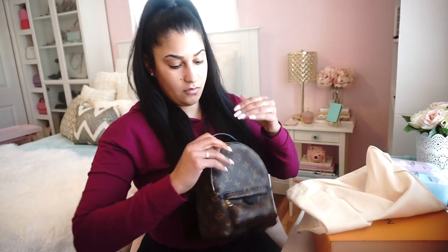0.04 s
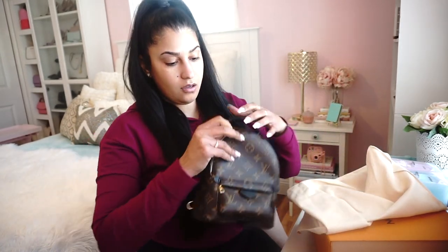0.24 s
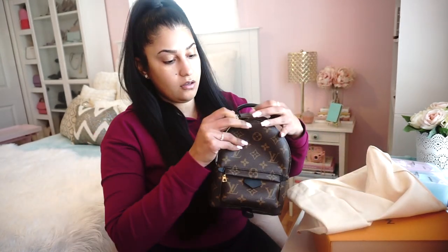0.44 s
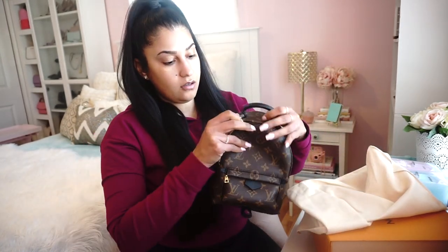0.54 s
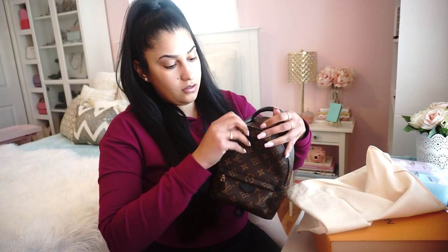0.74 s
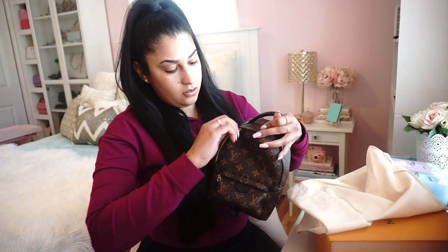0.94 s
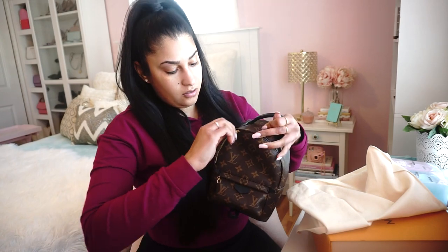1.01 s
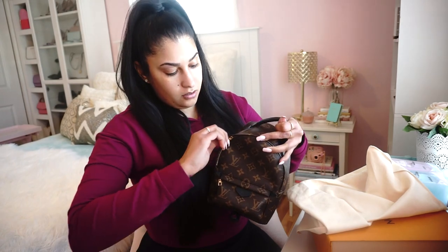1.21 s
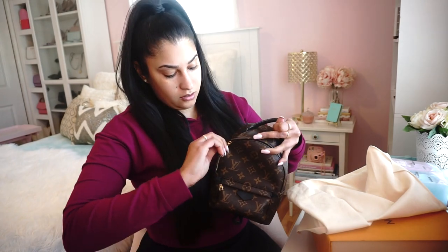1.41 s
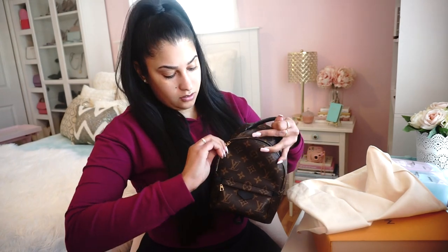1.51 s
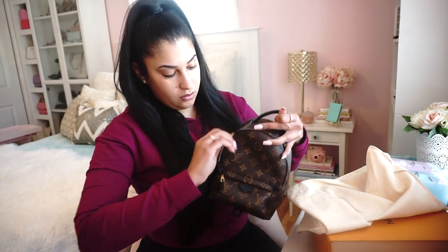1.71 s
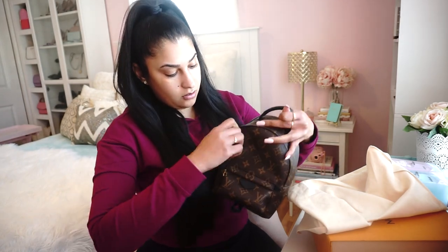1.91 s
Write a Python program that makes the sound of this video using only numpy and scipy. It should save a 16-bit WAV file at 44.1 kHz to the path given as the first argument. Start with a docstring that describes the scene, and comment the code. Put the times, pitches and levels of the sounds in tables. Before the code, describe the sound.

A stiff, hollow coated-canvas bag is turned in the hands, close to the microphone in a small quiet bedroom: soft rustle, a sharp zip-pull clink, light knocks, then a dense burst of louder bumps and a few last taps.

```python
"""In a small, quiet bedroom, a stiff coated-canvas bag is turned in the hands, heard from close by.
Friction is gritty noise, and knocks are damped impulses, through the bag's hollow and canvas modes.
Its metal zip pulls clash once: short tones, a decaying bright rattle and a faint ring; short bands of
noise give the rattle's lower part, a buckle's tail and brief scuffs. The buckle taps and hardware
ticks as damped sines; a diffuse room answers, over steady coloured hiss."""
import sys
import numpy as np
from scipy import signal
from scipy.fft import rfft, irfft, next_fast_len
from scipy.io import wavfile

SR = 44100
rng = np.random.default_rng(int(sys.argv[2]) if len(sys.argv) > 2 else 0)


def digitize_waveform(pressure):
    """Quantize a signal to 16-bit integers and store it at the path in sys.argv[1].

    Rows of a 2-D input are taken as channels; values are limited to [-1, 1].
    """
    field = np.atleast_2d(pressure).T
    bounded = np.clip(field, -1, 1)
    quanta = np.round(bounded * 32767).astype(np.int16)
    wavfile.write(sys.argv[1], SR, quanta)


N = 85995  # samples in the scene


def amp(db):
    """Level law: decibels to an amplitude ratio."""
    return 10 ** (np.asarray(db) / 20)


def unit(x):
    """Normalisation to an rms of 1."""
    return x / np.sqrt(np.mean(x ** 2) + 1e-20)


def peak(x):
    """Normalisation to a largest excursion of 1."""
    return x / abs(x).max()


def along(points, hz):
    """Interpolation of (frequency [Hz], value) points along a logarithmic frequency axis."""
    f, v = np.transpose(points)
    return np.interp(np.log(hz + 1), np.log(f + 1), v)


def filtered(x, response):
    """Linear filtering: the spectrum of x times a complex response of frequency."""
    padded = next_fast_len(N + SR // 2)
    freqs = np.fft.rfftfreq(padded, 1 / SR)
    return irfft(rfft(x, padded) * response(freqs), padded)[..., :N]


def modes(table, sign=-1):
    """Modal superposition: a sum of causal resonances, alternating in polarity if sign is -1."""
    def response(f):
        total = 0
        for k, (centre, width, db) in enumerate(table):
            resonance = 1j * f * width / (centre * centre - f * f + 1j * f * width)
            total = total + sign ** k * amp(db) * resonance
        return total
    return response


def panned(db):
    """Stereo level difference: gains that put left db above right."""
    return amp(np.array([db / 2, -db / 2]))[:, None]


def paired(pair, gain, alike):
    """Interchannel coherence: two unrelated noises coloured and mixed to a left-right likeness."""
    turn = lambda f: np.arccos(np.clip(along(alike, f), 0, 1)) / 2
    mid, side = filtered(pair, lambda f: gain(f) * [np.cos(turn(f)), np.sin(turn(f))])
    return np.array([mid + side, mid - side])


def gritty(per_s, smooth):
    """Random impulse noise: slips of uneven size over a share of smooth noise."""
    slips = (rng.random(N) < per_s / SR) * rng.standard_normal(N)
    return unit(slips) + abs(smooth) * rng.standard_normal(N)


DRAG_S = 0.046  # t60 of the short slide after a contact [s]


def click(hz, t60, drag=0):
    """Damped impact: a quickly rising, decaying sine of peak 1, plus a share of short slide."""
    t = np.arange(SR // 20) / SR
    rise = 1 - np.exp(-4 * t * hz)
    contact = amp(-60 * t / t60) * rise * np.sin(2 * np.pi * hz * t)
    slide = amp(-60 * t / DRAG_S) * rng.standard_normal(len(t))
    return peak(contact) + drag * slide


def add_at(out, s, sound):
    """Linear superposition: add a sound at time s, cut at the end of the scene."""
    start = round(s * SR)
    span = out[:, start:start + sound.shape[-1]]
    span += sound[..., :span.shape[1]]


# Colour of the hiss: (frequency [Hz], relative spectral density [dB per Hz])
HISS_COLOUR = [(15, -48), (25, -4), (217, -6.5), (326, -4), (427, -11.5), (988, -9.5), (1520, -16),
               (1890, -17.5), (3520, -20.5), (7310, -22), (16000, -21)]
# Likeness of the hiss at the two sides: (frequency [Hz], left-right likeness [0 to 1])
HISS_LIKENESS = [(60, 1), (240, 0.4), (950, 0), (15000, 0)]
HISS_DB = -44  # rms level


def hiss():
    """Stationary noise: room tone and microphone hiss of fixed spectrum and coherence."""
    noise = rng.standard_normal((2, N))
    coloured = paired(noise, lambda f: amp(along(HISS_COLOUR, f)), HISS_LIKENESS)
    return amp(HISS_DB) * unit(coloured)


# Strokes of rubbing: (time [s], level in the hollow [dB], in the canvas [dB], of the treble rustle [dB])
RUB_STROKES = [
    [(0.0, -42, -50, -44.5), (0.14, -50.5, -64, -54.5), (0.2, -66, -56, -72)],
    [(0.2, -41, -41, -32), (0.314, -46.5, -50, -41), (0.44, -54.5, -55, -53)],
    [(0.44, -51.5, -54, -45.5), (0.57, -42.5, -58, -56)],
    [(0.57, -41.5, -47.5, -46), (0.696, -49.5, -53.5, -42), (0.76, -50, -51, -45)],
    [(0.76, -36, -52, -45.5), (0.88, -41.5, -52.5, -52), (0.96, -56, -63, -79)],
    [(0.96, -51, -60, -57), (0.998, -53, -58, -52), (1.008, -41.5, -41.5, -48.5), (1.1, -37.5, -52.5, -48)],
    [(1.1, -36.5, -35, -42.5), (1.158, -36, -41.5, -44), (1.2, -37.5, -43, -46.5),
     (1.25, -33, -37.5, -39.5), (1.315, -33.5, -42, -47.5), (1.4, -77, -63.5, -54)],
    [(1.4, -100, -55, -53), (1.6, -74, -79, -77)],
    [(1.6, -42.5, -63, -62), (1.686, -46.5, -54, -68), (1.76, -89, -73, -64)],
    [(1.76, -70, -46, -48), (1.822, -48, -50, -46), (1.95, -53, -54, -50)],
]
# Resonances of the hollow bag: (frequency [Hz], width [Hz], level [dB])
HOLLOW_MODES = [(106, 59, -6.5), (278, 21.6, 6.5), (358.4, 31, -1), (429, 41.5, 0.5), (529.3, 34, -1),
                (573, 67, -5)]
# Resonances of the stiff canvas: (frequency [Hz], width [Hz], level [dB])
CANVAS_MODES = [(1051, 151, -1.5), (1488, 217, 2), (1714, 300, 1), (2038, 400, 5.5), (2400, 1440, 1),
                (3670, 1890, -5)]
# Colour of the rustling weave: (frequency [Hz], relative spectral density [dB per Hz])
RUSTLE_COLOUR = [(2350, -60), (4000, -3.5), (6180, -5.5), (9830, -3), (13400, -2), (16000, -11)]
WEAVE_ALIKE = 0.11  # left-right likeness
RUB_PAN_DB = 0  # left over right


def rubbing():
    """Friction-driven resonance: fingers and lining slip over hollow, canvas and weave."""
    t = np.arange(N) / SR
    s, *levels = np.transpose(np.concatenate(RUB_STROKES))
    low, mid, high = (amp(np.interp(t, s, db)) for db in levels)
    hollow = filtered(low * gritty(200, smooth=1), modes(HOLLOW_MODES))
    canvas = filtered(mid * gritty(900, smooth=0.78), modes(CANVAS_MODES))
    slips = high * np.array([gritty(2500, smooth=1.44) for _ in 'LR'])
    weave = paired(slips, lambda f: amp(along(RUSTLE_COLOUR, f)), [(1, WEAVE_ALIKE)])
    # each layer takes the rms of its own envelope
    level = lambda x, envelope: unit(x) * np.sqrt(np.mean(envelope ** 2))
    out = level(hollow, low) + level(canvas, mid) + level(weave, high)
    return panned(RUB_PAN_DB) * out


# Knocks on the bag: (time [s], level of the canvas snap [dB], snap pitch [Hz],
# level of the hollow thump [dB], thump pitch [Hz], left over right [dB])
BAG_KNOCKS = [(0.1487, -61, 902, -30, 287, 0), (0.1774, -26.5, 2040, -20.5, 523, -0.5),
              (0.183, -28.5, 1550, -49, 493, -3), (0.1883, -48, 1450, -35.5, 580, 3),
              (0.2684, -37, 4020, -31.5, 285, 0), (0.4831, -48, 1070, -31.5, 278, 0),
              (0.5721, -28.5, 2250, -25.5, 253, -1.5), (0.74, -40.5, 2180, -71, 277, -17),
              (0.7754, -46, 1100, -31, 296, -1), (0.7824, -42, 1100, -34, 514, -5),
              (0.807, -52, 1100, -34.5, 296, -3), (0.857, -35, 1120, -32.5, 280, -1),
              (0.9662, -26.5, 2630, -39, 290, -4), (1.0044, -24, 1640, -29.5, 432, -3),
              (1.0288, -30, 1050, -39, 426, -2), (1.05, -25, 1630, -27.5, 346, -2),
              (1.0817, -28, 990, -35, 264, 4), (1.102, -18.5, 1720, -25.5, 480, -5),
              (1.1186, -16.5, 1190, -35, 420, -2.5), (1.1325, -13, 1100, -16.5, 437, 1),
              (1.1386, -13.5, 1430, -16, 580, -3.5), (1.1505, -18, 960, -29, 280, -0.5),
              (1.183, -22.5, 1020, -18, 436, -1.5), (1.1919, -20.5, 1050, -17, 430, -0.5),
              (1.203, -27, 1100, -27, 298, 0), (1.2162, -18, 1030, -17, 407, -4),
              (1.2257, -14, 1080, -13.5, 464, -3), (1.2358, -18, 1070, -14, 524, -1),
              (1.2502, -25, 1210, -20.5, 446, 5), (1.2681, -23.5, 840, -19.5, 480, -2),
              (1.2826, -19.5, 1050, -21.5, 320, 1), (1.297, -21, 1060, -23.5, 258, -0.5),
              (1.5972, -34.5, 970, -34, 328, -3.0), (1.6203, -30.5, 1040, -26.5, 424, 1),
              (1.6271, -50, 1450, -30, 400, -3), (1.6434, -32.5, 1060, -32.5, 420, -4),
              (1.6483, -37, 990, -27.5, 307, -0.5), (1.8049, -34, 1000, -28.5, 367, -3)]
SNAP_TURNS, PUSH_TURNS = 2.96, 4.14  # t60 of the snap's and the thump's contact [cycles]
DRAG, THUMP_DRAG = 0.22, 0.072  # share of slide after snap and thump
CRACKLE_S, CRACKLE, CRACKLES_PER_S = 0.057, 0.31, 1000  # smaller snaps: t60 [s], share, rate [per s]
PUSH, PUSH_LOW_HZ = 0.62, 210  # direct push beside the ring; little is radiated below this


def knocks():
    """Impulse excitation: contacts drive the hollow's thump and the canvas's crackling snap."""
    n = SR // 5
    impulse = np.eye(1, N)[0]

    def hollow(f):
        push = PUSH * (1j * f / (1j * f + PUSH_LOW_HZ)) ** 2
        return push + modes(HOLLOW_MODES, sign=1)(f)

    hollow_ring = filtered(impulse, hollow)[:n]
    canvas_ring = filtered(impulse, modes(CANVAS_MODES))[:n]
    crackle_decay = amp(-60 * np.arange(n) / SR / CRACKLE_S)
    out = np.zeros((2, N))
    for s, snap_db, snap_hz, thump_db, thump_hz, pan_db in BAG_KNOCKS:
        push = click(thump_hz, PUSH_TURNS / thump_hz, THUMP_DRAG)
        thump = -signal.fftconvolve(hollow_ring, push)[:n]
        crackles = rng.standard_normal(n) * (rng.random(n) < CRACKLES_PER_S / SR)
        train = CRACKLE * crackle_decay * crackles
        train[0] = 1  # the main snap leads its crackles
        contact = click(snap_hz, SNAP_TURNS / snap_hz, DRAG)
        snap = signal.fftconvolve(canvas_ring, contact)[:n]
        snap = signal.fftconvolve(snap, train)[:n]
        knock = amp(thump_db) * peak(thump) + amp(snap_db) * peak(snap)
        add_at(out, s, panned(pan_db) * knock)
    return out


# Clashes of the zip pulls: (time [s], peak level [dB], pitch [Hz])
ZIP_CLASHES = [(0.201, -3.5, 9300), (0.2042, 4, 10800), (0.2053, 0, 10600), (0.2077, -9, 11800),
               (0.2097, -3, 11300), (0.2341, -8.5, 5680)]
# Colour of the rattle: (frequency [Hz], relative spectral density [dB per Hz])
RATTLE_COLOUR = [(880, -62), (1500, -33.5), (3090, -23), (5170, -29), (6370, -8), (10500, -6.5), (11200, 0),
                 (14200, -5.5), (16000, -14)]
# Resonances of the metal: (frequency [Hz], width [Hz], level [dB])
BRASS_MODES = [(8500, 500, -5), (9660, 300, -4), (11000, 250, 0), (11550, 300, -3), (12500, 500, -3),
               (15500, 300, -5)]
CLASH_TURNS = 16  # t60 of a clash [cycles]
RATTLE_DB, RATTLE_T60_S = -12, 0.17  # level at the first clash, decay
RING_DB = -15  # ring, relative to the clashes and rattle
ZIP_ALIKE, ZIP_PAN_DB = 0.52, 2  # left-right likeness of the rattle; left over right


def zip_pulls():
    """Repeated impact and modal ringing: the pulls clash, chatter away and ring faintly."""
    t = np.arange(N) / SR - ZIP_CLASHES[0][0]
    slips = np.array([gritty(4900, smooth=1) for _ in 'LR'])
    grit = unit(paired(slips, lambda f: amp(along(RATTLE_COLOUR, f)), [(1, ZIP_ALIKE)]))
    hits = amp(RATTLE_DB - 60 * abs(t) / RATTLE_T60_S) * (t > 0) * grit
    for s, db, hz in ZIP_CLASHES:
        clash = np.diff(click(hz, CLASH_TURNS / hz))  # the difference favours treble
        add_at(hits, s, amp(db) * peak(clash))
    ring = unit(filtered(hits, modes(BRASS_MODES))) * hits.std()
    return panned(ZIP_PAN_DB) * (hits + amp(RING_DB) * ring)


# Short bands of noise, the zip rattle's lower part, the buckle's tail and brief scuffs:
# (time [s], length [s], pitch [Hz], width of the resonance [Hz], level [dB])
NOISE_BANDS = [(0.216, 0.027, 4900, 1500, -35.5), (0.225, 0.034, 4170, 1500, -35),
               (0.33, 0.057, 2150, 447, -46), (0.568, 0.018, 4070, 1800, -45),
               (.824, 0.019, 3920, 1600, -38), (1.586, 0.06, 2610, 1200, -51.5),
               (1.846, 0.022, 2430, 905, -43)]


def noise_bands():
    """Band-pass filtering: gritty noise through a squared resonance, swelling and fading."""
    t = np.arange(N) / SR
    out = np.zeros(N)
    for s, length, hz, width_hz, db in NOISE_BANDS:
        resonance = modes([(hz, width_hz, 0)])
        band = unit(filtered(gritty(1500, smooth=1), lambda f: resonance(f) ** 2))
        swell = np.sin(np.pi * np.clip((t - s) / length, 0, 1))
        out += amp(db) * swell * band
    return panned(RUB_PAN_DB) * out


# Taps of a buckle: (time [s], level [dB])
BUCKLE_TAPS = [(0.3023, -24.5), (.305, -22), (0.3109, -27.5)]
# Modes of the buckle: (frequency [Hz], level [dB], t60 [s])
BUCKLE_MODES = [(1955, 0, 0.02), (3200, -5, 0.012), (4300, -7.5, 0.0056)]


def buckle():
    """Modal decay: each tap sums the buckle's damped sines."""
    tap = sum(amp(db) * click(hz, t60) for hz, db, t60 in BUCKLE_MODES)
    out = np.zeros((2, N))
    for s, db in BUCKLE_TAPS:
        add_at(out, s, amp(db) * tap)
    return out


# Ticks of the hardware: (time [s], level [dB], pitch [Hz])
HARDWARE_TICKS = [(0.5711, -29.5, 8560), (0.9661, -19, 12900), (1.005, -31, 12600), (1.102, -25, 5000),
                  (1.119, -27, 10400), (1.135, -22, 5500), (1.1497, -26.5, 5630), (1.1814, -25.5, 9300),
                  (1.217, -23, 11000), (1.2245, -19.5, 10600), (1.2352, -23, 8600), (1.241, -32, 9550),
                  (1.249, -27, 12800), (1.267, -25, 8750), (1.2819, -21, 10700), (1.295, -18, 10050),
                  (1.6183, -30, 12700), (1.763, -31, 8900), (1.801, -26, 11100)]
TICK_S, TICK_DRAG = 0.001, 0.29  # t60 of a tick [s], share of slide after it


def ticks():
    """Brief metallic impact: heavily damped, differenced clicks, each with a random left-right level."""
    out = np.zeros((2, N))
    for s, db, hz in HARDWARE_TICKS:
        tick = np.diff(np.pad(click(hz, TICK_S, TICK_DRAG), 1))
        pan = panned(rng.normal(RUB_PAN_DB, 4))
        add_at(out, s, pan * amp(db) * peak(tick))
    return out


# Decay of the room: (frequency [Hz], t60 [s])
ROOM_DECAY = [(200, 0.3), (2000, 0.22), (6000, 0.19), (14000, 0.073)]
# Likeness of the room's answer at the two sides: (frequency [Hz], left-right likeness [0 to 1])
ROOM_LIKENESS = [(100, 1), (500, 0.82), (2000, 0.033), (8000, 0.024)]
ROOM_DB, ROOM_LOW_HZ = -4.5, 900  # level of the answer; it weakens below this frequency


def room(x):
    """Diffuse reverberation: convolution with noise whose every frequency decays at its own rate."""
    noise = rng.standard_normal((2, SR // 2))
    hz, t, bins = signal.stft(noise, SR, nperseg=256)
    decay = amp(-60 * t / along(ROOM_DECAY, hz)[:, None])
    tail = signal.istft(bins * decay, SR, nperseg=256)[1]
    tail = paired(tail, lambda f: f / np.hypot(f, ROOM_LOW_HZ), ROOM_LIKENESS)[:, :SR // 2]
    delayed = np.pad(x, ((0, 0), (150, 0)))  # 150 samples before the answer begins
    return signal.fftconvolve(delayed, tail / np.linalg.norm(tail[0]), axes=1)[:, :N]


def scene():
    """Superposition: the bag's direct sound, the room's answer and the hiss add."""
    bag = rubbing() + knocks() + zip_pulls() + noise_bands() + buckle() + ticks()
    return bag + amp(ROOM_DB) * room(bag) + hiss()


TOP_HZ = 15900  # band limit


def record(dry):
    """Soft saturation and band limiting: peaks round off towards 0.9, then the top is removed."""
    rounded = dry / (1 + abs(dry / .9) ** 4) ** (1 / 4)
    return filtered(rounded, lambda hz: hz < TOP_HZ)


dry = scene()
out = record(dry)
digitize_waveform(out)
```